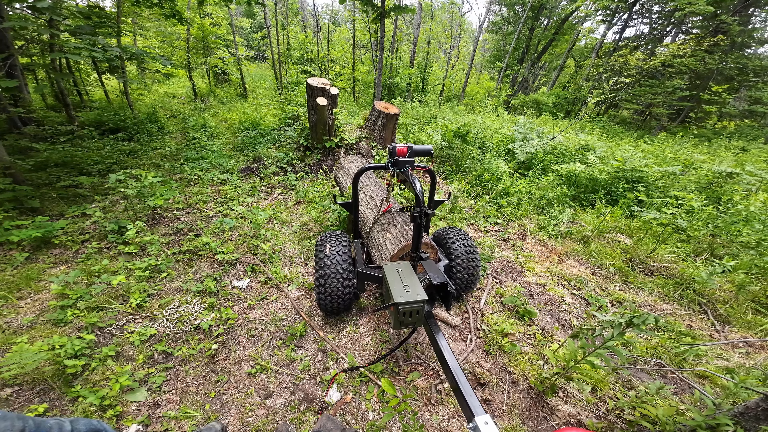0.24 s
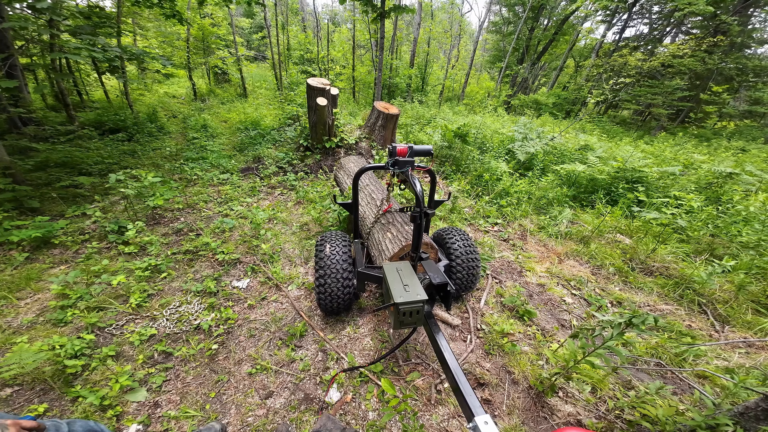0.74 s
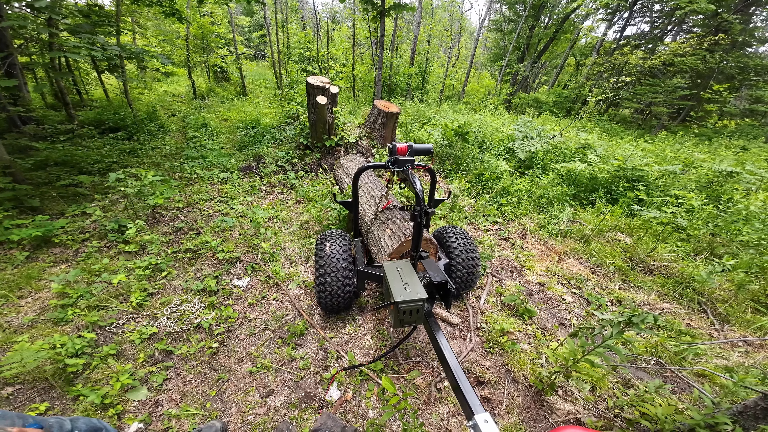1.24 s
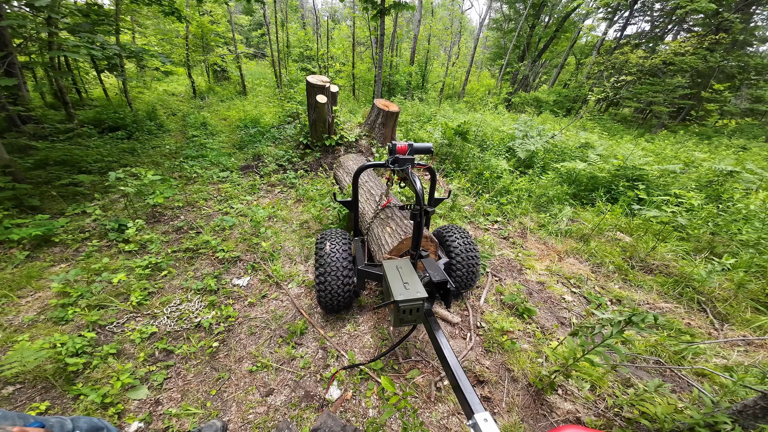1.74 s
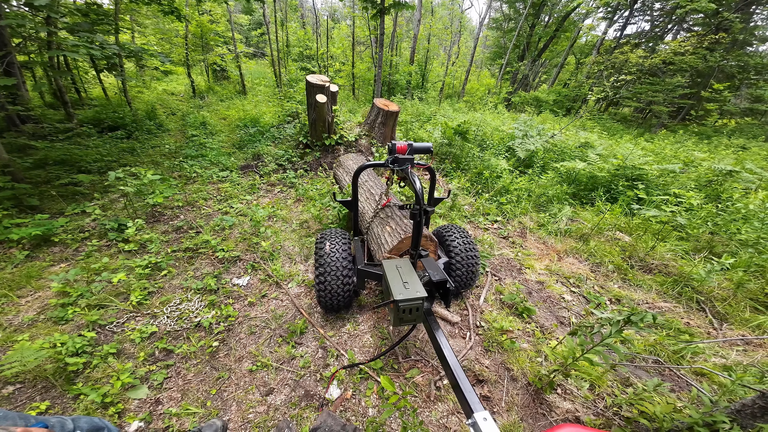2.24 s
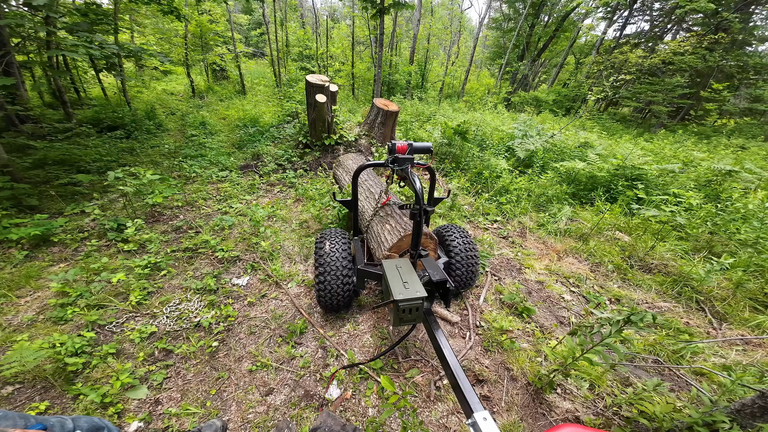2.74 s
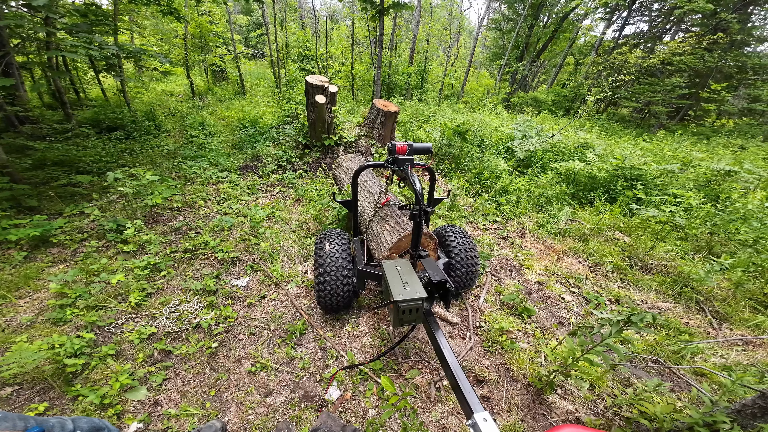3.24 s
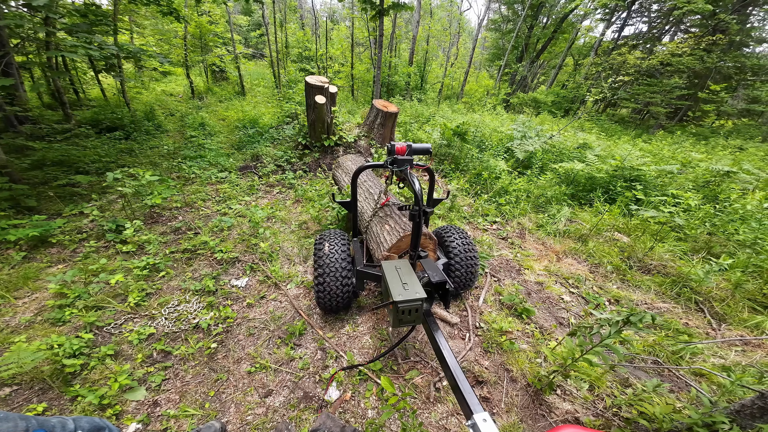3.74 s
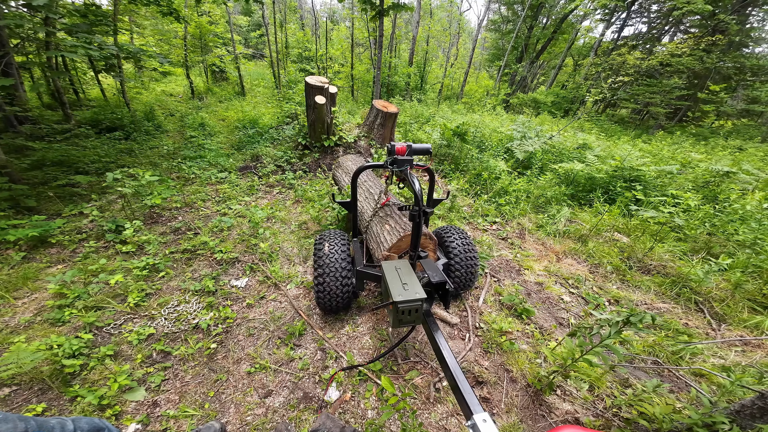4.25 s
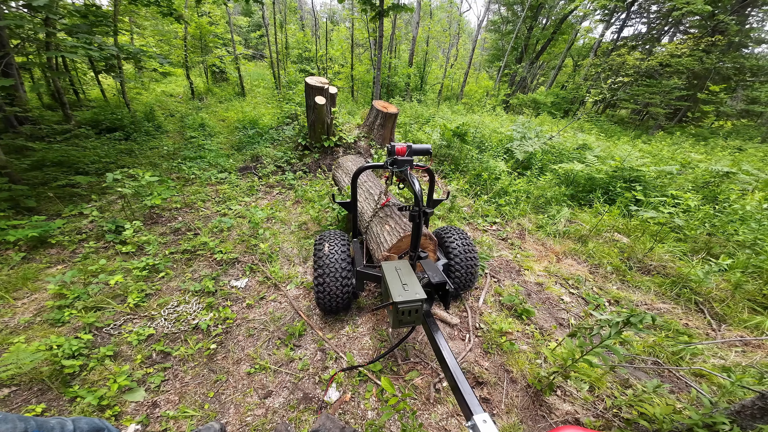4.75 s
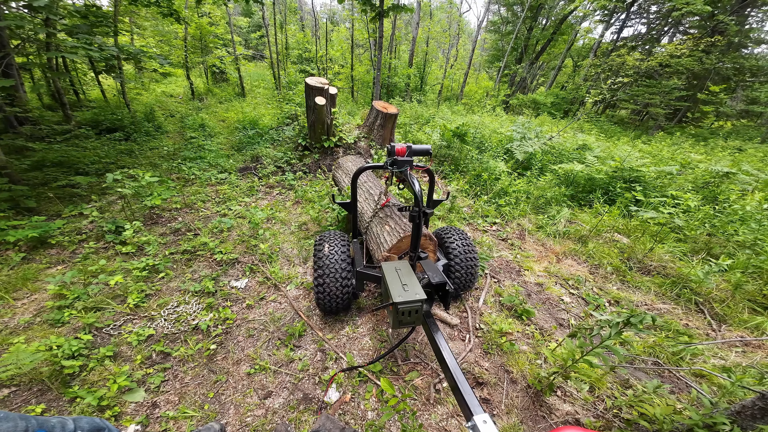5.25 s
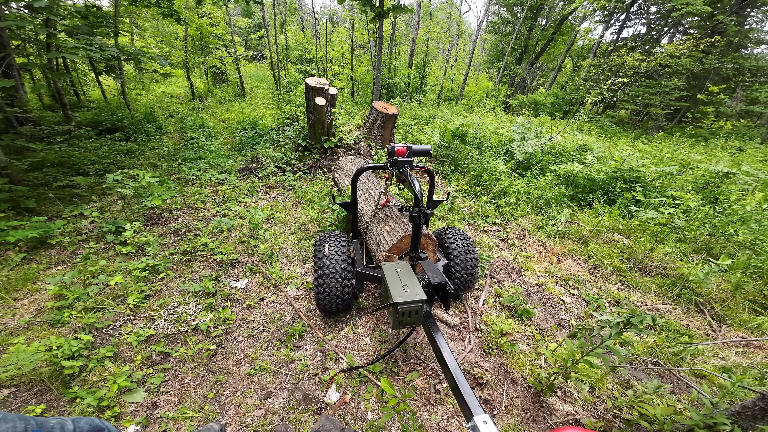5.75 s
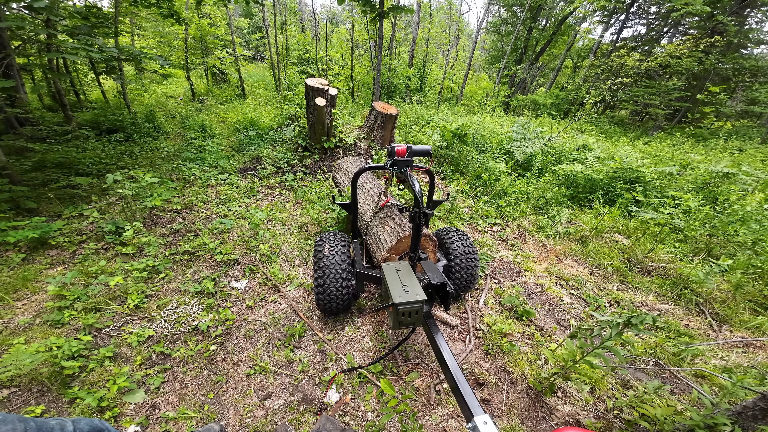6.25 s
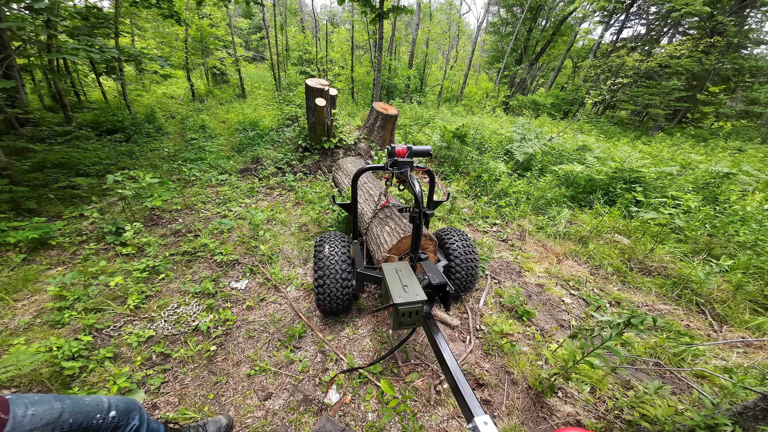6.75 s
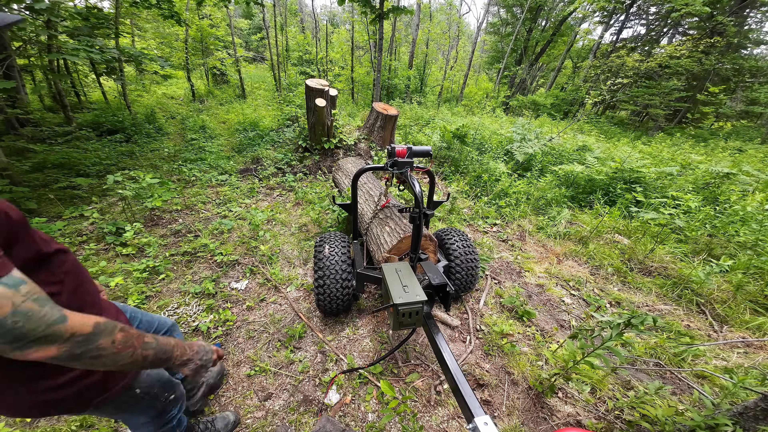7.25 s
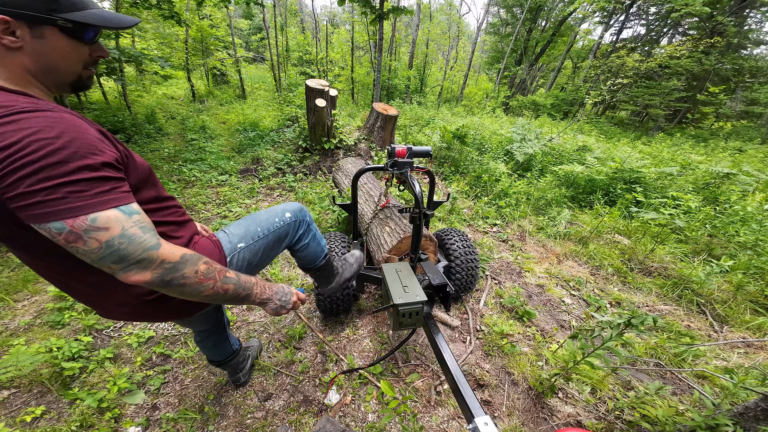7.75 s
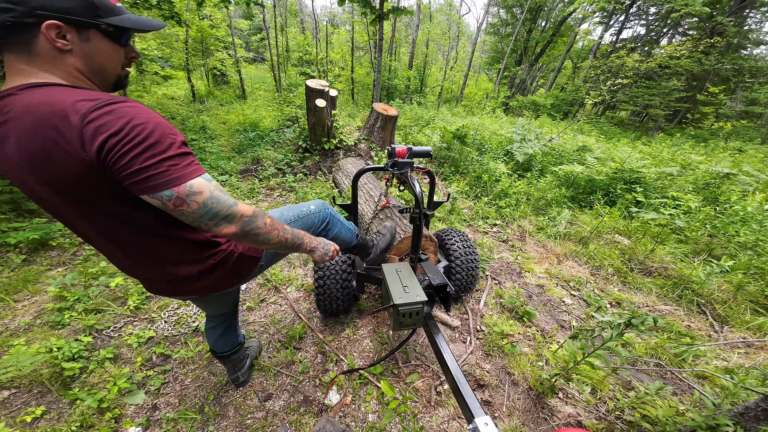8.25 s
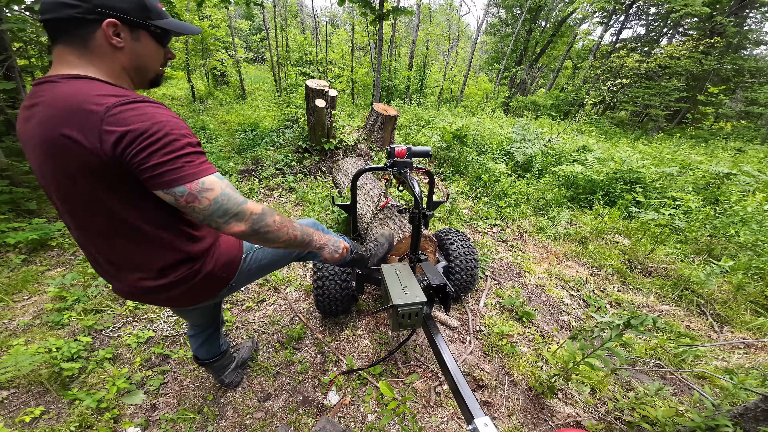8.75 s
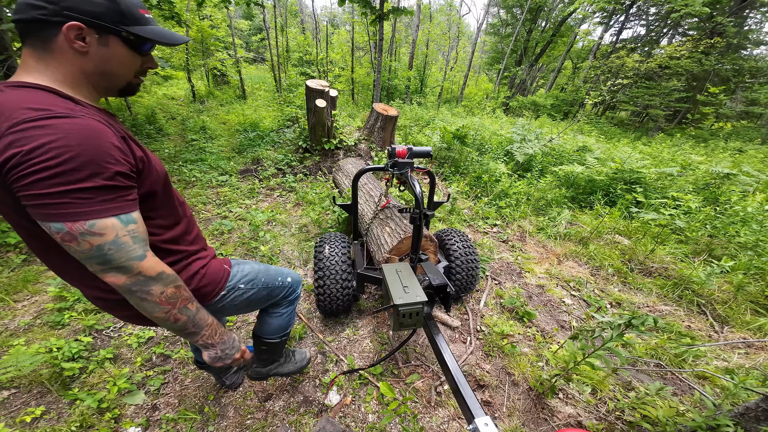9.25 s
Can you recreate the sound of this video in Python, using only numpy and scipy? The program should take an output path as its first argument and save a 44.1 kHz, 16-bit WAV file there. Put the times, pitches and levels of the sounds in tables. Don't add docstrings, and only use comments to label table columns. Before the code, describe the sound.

Five short winch bursts, each starting with a sharp click and a bright, grinding gear whirr over a deep hum, stop quickly and leave thin metallic ringing. Soft leaf hiss and low wind buffeting fill the gaps. Later, footsteps rustle, twigs crack and a log knocks against steel, with bass jolts through the frame-mounted microphone; dry outdoor space with slight tree echo.

```python
import sys
import numpy as np
from scipy import signal
from scipy.fft import rfft, irfft, next_fast_len
from scipy.io import wavfile
from scipy.ndimage import uniform_filter1d

SR = 44100
rng = np.random.default_rng(int(sys.argv[2]) if len(sys.argv) > 2 else 0)


def wav_out(sig):
    wavfile.write(sys.argv[1], SR, np.round(np.clip(np.atleast_2d(sig).T, -1, 1) * 32767).astype(np.int16))


def nominal_scale(level):
    x = np.asarray(level, float) / 20
    return 10 ** x


N = 419214
T = np.arange(N) / SR
SLOW = np.arange(0, N + 32, 32) / SR


def unit(x):
    return x / np.sqrt(np.mean(x ** 2))


def noise():
    return rng.standard_normal(N)


def band(x, lo_hz, hi_hz):
    return signal.sosfilt(signal.butter(2, [lo_hz, hi_hz], "bandpass", fs=SR, output="sos"), x)


def colour(x, points):
    hz, db = np.transpose(points)
    size = next_fast_len(N)
    f = np.log(np.arange(size // 2 + 1) * SR / size + 1)
    return irfft(rfft(x, size) * nominal_scale(np.interp(f, np.log(hz), db)), size)[..., :N]


def ring(x, hz, t60):
    r = np.exp(-np.log(1000) / (t60 * SR))
    turn = 2 * np.pi * hz / SR
    return np.sqrt(4 * (1 - r)) * signal.lfilter([np.sin(turn)], [1, -2 * r * np.cos(turn), r * r], x)


def decaying_modes(modes, t):
    return sum(nominal_scale(db - 60 * t / t60) * np.sin(2 * np.pi * hz * t) for hz, t60, db in modes)


def walk(rate):
    k = int(SR / rate)
    held = np.repeat(rng.standard_normal(N // k + 1), k)[:N]
    return unit(uniform_filter1d(uniform_filter1d(held, k), k))


def curves(tables):
    s, *columns = np.concatenate(tables).T
    return [np.interp(T, s, c) for c in columns]


def swell(s, db, rise_s, fall_s):
    return nominal_scale(db - 30 * np.maximum((s - SLOW) / rise_s, (SLOW - s) / fall_s))


def summed(gains):
    return np.interp(T, SLOW, np.sqrt(sum(g ** 2 for g in gains)))


def strike(events, burst):
    out, t = np.zeros(N + SR), np.arange(SR // 8) / SR
    for row in events:
        i = int(row[0] * SR)
        out[i:i + len(t)] += nominal_scale(row[1]) * burst(row, t)
    return out[:N]


def crack(row, t):
    hz, body_db = row[2:]
    snap = rng.standard_normal(len(t)) * (np.exp(-t / 0.0034) + 0.16 * np.exp(-t / 0.0093))
    bright = band(band(snap, 0.3 * hz, min(1.27 * hz, 16000)), 0.72 * hz, 20000)
    body = band(snap, 230, 3260) + 0.66 * band(snap, 360, 810)
    return 1.15 * bright + nominal_scale(min(body_db, 6) + 0.5) * body


# motor_on_s, motor_off_s, free_whirr_db, coast_s, frame_decay_db_per_s
PULLS = [
    (-.1, 0.403, -30.5, 0.14, 48),
    (0.8571, 1.613, -30, 0.079, 28),
    (2.197, 2.883, -30, 0.15, 12.5),
    (3.538, 4.02, -30.5, 0.44, 22),
    (5.238, 5.723, -33, 0.16, 3.5),
]


def shaft(pulls):
    nexts = [rows[0][0] for rows in pulls[1:]] + [T[-1]]
    parts = []
    for rows, pull, upto in zip(pulls, PULLS, nexts):
        last_s, last_hz, last_db = rows[-1]
        parts += [rows, [(upto - .02, last_hz, last_db - pull[4] * (upto - last_s))]]
    return curves(parts)


def motor(on_s, off_s, db, coast_s):
    engage_db, spin_up_s = -15.5, 0.025
    inrush_db, inrush_s = 3, 0.075
    cut_db, cut_s, coast_db, coast_growl_db = -26.5, 0.029, -37, 12
    times = [on_s - .016, on_s, on_s + spin_up_s, on_s + spin_up_s + inrush_s,
             off_s, off_s + cut_s, off_s + cut_s + coast_s, off_s + 1.7]
    shape_db = np.interp(SLOW, times, [-60, engage_db, inrush_db, 0, 0, cut_db, coast_db, -120])
    extra_db = coast_growl_db * np.interp(SLOW, times[4:6], [0, 1]) * np.array([[0], [1]])
    return (SLOW > times[0]) * nominal_scale(db + shape_db + extra_db)


# loudest_s, level_db, half_length_s, times_shaft_speed
GROANS = [(0.071, -40, .2, 9), (.22, -39.5, 0.28, 7.8), (0.2, -41, 0.13, 5.1), (.13, -39, 0.053, 2),
          (0.36, -38, .11, 9), (.27, -36.5, 0.11, 11), (.03, -38, 0.15, 4.2), (0.938, -38, 0.13, 3.2),
          (1.1, -41.5, 0.31, 4.2), (1.14, -38.5, 0.31, 3), (1.261, -36.5, .2, 10), (0.94, -40, .15, 9),
          (1.533, -38, .15, 9), (1.377, -42, 0.18, 5.4), (1.3, -29, 0.059, 2.04), (1.415, -35, 0.04, 1.92),
          (1.545, -36, 0.078, 1.97), (1.56, -40.5, .3, 4.1), (2.29, -45.5, 0.33, 6.1),
          (2.423, -39, 0.19, 10.9), (2.65, -45, .3, 6.3), (2.67, -44.5, 0.52, 4.24),
          (3.6, -41.5, 0.23, 3.63), (3.7, -39.5, 0.14, 8.6), (3.93, -41, 0.21, 7), (3.94, -40, 0.34, 5.83),
          (3.971, -40.5, 0.25, 5.2), (3.95, -47, .2, 14), (5.29, -36, .12, 3.96), (5.4, -41, 0.21, 5.8),
          (5.67, -36, 0.25, 5.1), (5.64, -37, .25, 6), (6, -43, 0.13, 6.5)]
# loudest_s, level_db, rise_s, fall_s
WHINE = [(.2, -37, .9, 0.83), (1.05, -36.5, 0.63, 1.8), (1.55, -39, 0.52, .25), (2.31, -28, 0.12, 0.34),
         (2.85, -38, 0.49, .15), (3.58, -35, .1, .35), (3.87, -35.5, .25, .3), (3.98, -36.5, 0.19, 0.23),
         (5.3, -39, 0.11, 0.48), (5.5, -42, 0.45, 0.43), (5.67, -42, .3, 0.21)]


def singing(turns):
    out = unit(ring(noise(), 2196, 0.085)) * summed(swell(*row) for row in WHINE)
    for s, db, half_s, times in GROANS:
        near = slice(int(max(s - half_s, 0) * SR), int((s + half_s) * SR))
        gain = nominal_scale(db + 3 - 30 * ((T[near] - s) / half_s) ** 2)
        out[near] += gain * np.sin(2 * np.pi * times * turns[near])
    return out


# time_s, turns_hz, unbalance_db
SHAFT = [
    [(0, 129.8, -33), (.06, 121.8, -29), (.15, 135.1, -34), (.3, 136.7, -35), (.335, 125.9, -29),
     (.4, 127.7, -33), (.52, 112.7, -34.5), (.59, 111.6, -54)],
    [(.86, 110, -48), (.9, 132.7, -35), (.97, 122.1, -30), (1.16, 146.9, -35), (1.31, 121.9, -29),
     (1.39, 135, -25), (1.5, 140, -34), (1.58, 118.8, -29), (1.75, 117.2, -41)],
    [(2.2, 116.6, -58), (2.25, 116.9, -28), (2.35, 123.1, -34), (2.4, 119.7, -28), (2.49, 115.6, -30),
     (2.546, 103.7, -27), (2.7, 104.1, -28), (2.86, 118.2, -23), (3.01, 107.9, -55)],
    [(3.54, 144, -46), (3.63, 125.3, -30), (3.79, 107.3, -29), (3.835, 109.9, -42), (3.916, 107.8, -29),
     (4.04, 108.7, -32), (4.11, 109.1, -36)],
    [(5.232, 151.1, -57), (5.29, 145.9, -31), (5.365, 107.7, -21), (5.41, 104.2, -11), (5.445, 97.25, -13),
     (5.474, 92.4, -11), (5.55, 93.8, -33), (5.63, 107, -41), (5.8, 101.9, -46)],
]
# pitch_hz, level_db_per_hz
GEARS = [(100, -41), (170, -3), (250, 1), (310, -9.5), (450, 6.5), (750, 7), (930, 6), (1300, 11),
         (1700, 5.5), (2200, 7.5), (3200, 1), (4200, -3.5), (8000, -15), (16000, -25.5)]
# pitch_hz, t60_s, level_db
HOUSING = [(555, 0.11, -19), (742, 0.021, -4.5), (1242, 0.12, -17), (1345, 0.18, -12.5), (1800, 0.099, -14),
           (2203, 0.14, -12), (2293, 0.14, -15), (2745, 0.11, -37), (3400, 0.054, -14),
           (3190, 0.076, -15.5), (3890, 0.007, -15), (4960, 0.07, -23), (6300, 0.019, -26),
           (7610, 0.014, -27)]


def winch():
    free_hz, wobble = 130, .014
    whirr_db_per_oct, growl_db, growl_db_per_oct = 15.5, -5, 24.5
    beat_db_per_shake_db = 0.36
    creep = (5.55, 5.835, -46, .04)
    hz, shake_db = shaft(SHAFT)
    octaves = np.log2(hz / free_hz)
    gains = sum(motor(*pull[:4]) for pull in list(PULLS) + [creep])
    whirr, growl = (np.interp(T, SLOW, gain) for gain in gains)
    low_db = growl_db - growl_db_per_oct * octaves + 2.9 * walk(14)
    coast = growl / (whirr + 1e-12)
    hunting = wobble * np.clip(2 + 6 * octaves, 0, 1) * walk(14)
    turns = np.cumsum(hz * (1 + .006 * walk(60) + hunting)) / SR
    beats = unit(np.diff(np.floor(turns), prepend=0.))
    meshes = rng.standard_normal((4, 330)) / np.sqrt(330)
    shares = np.array([walk(18) for _ in meshes])
    shares = shares / np.linalg.norm(shares, axis=0)
    beats = sum(share * signal.fftconvolve(beats, mesh)[:N] for share, mesh in zip(shares, meshes))
    rasp = noise() * (1 + 0.11 * np.cos(2 * np.pi * turns)) * nominal_scale(2.0 * walk(400) + 0.54 * walk(41))
    drive = rasp + 1.35 * nominal_scale(beat_db_per_shake_db * (shake_db + 30)) * band(beats, 300, 1900)
    drive = drive * whirr * nominal_scale(whirr_db_per_oct * octaves)
    gears = colour(drive, GEARS)
    gears = gears * np.std(drive) / np.std(band(gears, 725, 6000))
    body = nominal_scale(-5.5) * sum(nominal_scale(db) * ring(drive, mode_hz, t60) for mode_hz, t60, db in HOUSING)
    growling = coast * nominal_scale(low_db + 2.0) * band(gears, 103, 556)
    return nominal_scale(1.0) * band(gears, 950, 10600) + growling + body + singing(turns) * np.minimum(whirr * nominal_scale(34), 1)


# time_s, pitch_hz, level_db
SHAKE = [
    [(0.0, 131.6, -34), (0.044, 128, -27.5), (0.102, 109, -48), (0.164, 120, -25), (0.212, 135.5, -35),
     (0.32, 134.2, -31.5), (0.386, 117, -36.5), (0.482, 118.6, -33.5), (0.59, 113.7, -51)],
    [(0.86, 88.3, -47), (0.936, 108.5, -30), (1.15, 147.2, -35), (1.248, 141.2, -32), (1.392, 118.6, -28.5),
     (1.44, 136, -29.5), (1.52, 134.9, -39), (1.586, 114.6, -26), (1.75, 118.2, -43.5)],
    [(2.2, 116.7, -52), (2.248, 114.5, -31), (2.356, 117.5, -23.5), (2.38, 117, -47), (2.49, 117.3, -30.5),
     (2.556, 103.7, -20.5), (2.7, 104, -29.5), (2.846, 116.1, -27), (3.01, 110, -48.5)],
    [(3.54, 107, -56), (3.574, 105.9, -36), (3.648, 124, -36.5), (3.69, 114.2, -33), (3.794, 111.4, -21),
     (3.836, 110.9, -36.5), (3.922, 112, -18), (4.05, 109.5, -28), (4.13, 109.1, -44.5)],
    [(5.235, 105.5, -74), (5.259, 105.9, -34), (5.331, 107.3, -39), (5.391, 105.9, -17.5),
     (5.493, 93.4, -20.5), (5.517, 89.4, -34), (5.673, 104.4, -35.5), (5.815, 87.16, -39),
     (5.93, 87.5, -46.5)],
]
# lull_s, level_db, half_width_s
LULLS = [(.27, -6, 0.028), (.375, -5, .02), (1.0, -7, 0.026), (1.11, -5, .02), (1.345, -12, 0.024),
         (1.5, -5, 0.043), (2.575, -10, .015), (5.444, -12, .015)]
# time_s, level_db
SHOVES = [
    [(8.04, -82), (8.084, -37), (8.18, -37), (8.202, -25), (8.302, -25), (8.32, -32), (8.456, -45),
     (8.58, -47.5)],
    [(8.6, -51), (8.732, -18.5), (8.794, -30), (8.882, -36.5), (8.916, -27), (9.0, -36), (9.028, -45),
     (9.1, -43)],
    [(9.12, -48), (9.136, -51), (9.24, -44.5), (9.268, -56), (9.284, -52), (9.426, -51), (9.466, -32.5),
     (9.505, -40)],
]


def frame():
    shove_from_s, shove_hz = 8.04, 84
    flutter_db, steady_hz, overtone_db = 2, 110, -24.5
    hz, db = shaft(SHAKE)
    shoved = T > shove_from_s
    hz = np.where(shoved, shove_hz * (1 + 0.0547 * walk(8)), hz)
    lull_db = sum(dip_db * np.exp(-((T - s) / half_s) ** 2) for s, dip_db, half_s in LULLS)
    level_db = np.where(shoved, curves(SHOVES)[0] - 0.1, db + lull_db)
    depth_db = 2.5 + flutter_db * np.clip((hz - steady_hz) / 30, 0, 1)
    gain = nominal_scale(level_db + depth_db * np.minimum(walk(30), .2))
    turn = 2 * np.pi * np.cumsum(hz * (1 + 0.04636 * walk(40))) / SR
    overtone = nominal_scale(overtone_db + 4 * walk(15)) * np.sin(2 * turn)
    left = nominal_scale(4.0 + .8 * walk(20)) * (np.sin(turn) + overtone)
    right = nominal_scale(-3.0 + 2.4 * walk(6)) * np.sin(turn - 1.9 + 1.13 * walk(7))
    left_jolt = unit(band(band(noise(), 54, 123), 54, 123))
    right_jolt = 0.39 * unit(band(noise(), 65, 126))
    jolt = shoved * nominal_scale(-2.0) * np.array([left_jolt, right_jolt])
    return gain * nominal_scale(6.5) * (np.array([left, right]) + jolt)


# pitch_hz, level_db_per_hz
WOOD = [(35, -29), (60, 9), (130, -4.5), (165, -7), (600, -16.5), (1400, -21.5), (3300, -26.5),
        (8000, -33.5), (16000, -46.5)]
# pitch_hz, side_minus_mid_db
WOOD_SIDE = [(60, 3), (110, 2), (200, -2), (380, -6), (1290, -7), (2380, -6), (4400, -4), (8120, -2),
             (15000, 0)]
# strongest_s, level_db
GUSTS = [(0, -34), (0.501, -37), (1.15, -31.5), (1.67, -33.5), (2.3, -32), (2.91, -34), (3.6, -41),
         (4.1, -38.5), (5.8, -36), (8.31, -34), (8.9, -31.5), (9.5, -45)]


def background():
    wood_db, calm_db, gust_rise_s, gust_fall_s = -63, -56, 0.48, 0.99
    mid = colour(noise(), WOOD)
    side = colour(np.roll(mid, N // 2), WOOD_SIDE)
    hiss = nominal_scale(wood_db + walk(1)) / np.std(band(mid, 200, 16000)) * np.array([mid + side, mid - side])
    gain = summed([nominal_scale(calm_db)] + [swell(*row, gust_rise_s, gust_fall_s) for row in GUSTS])
    own, opposite = (unit(band(noise(), 29, 62)) * gain * nominal_scale(2.0 * walk(6)) for _ in range(2))
    return hiss + nominal_scale(-9.0) * own + nominal_scale(8.0) * opposite * np.array([[1.22], [-.78]])


# pitch_hz, t60_s, level_db
CABLE = [(420, 2.43, 1), (432, 1.2, -7), (850, 3.6, -12.5)]
# pitch_hz, t60_s
ARCH = [(1330, 0.62), (2205, .5)]
# cable_db, lower_arch_db, upper_arch_db
STOPS = [
    (-58, -70, -68),
    (-53.5, -62, -52),
    (-59, -52, -60),
    (-59.5, -68, -53.5),
    (-62.5, -52, -55),
]


def cable():
    out = 0
    for pull, (db, *arch_db) in zip(PULLS, STOPS):
        t = np.maximum(T - pull[1], 0)
        modes = [(hz, t60, db + mode_db) for hz, t60, mode_db in CABLE]
        modes += [(*mode, hit_db) for mode, hit_db in zip(ARCH, arch_db)]
        out = out + decaying_modes(modes, t)
    return out * nominal_scale(2 * walk(20))


# start_s, level_db
SWITCH = [
    (0.7059, -40.5),
    (2.0459, -40.5),
    (3.4004, -40.5),
    (4.2925, -54.5),
    (4.371, -53.5),
    (4.645, -61),
    (5.1042, -42),
    (6.4721, -43.5),
]
# pitch_hz, t60_s, level_db
SWITCH_MODES = [(1780, .025, -13), (2990, 0.031, -8.5), (7210, .015, -12)]


def relay():
    contactor = (-31.5, 6420, -1)
    rows = [(pull[0], *contactor) for pull in PULLS[1:]]
    rows += [(*row, 7340, 4) for row in SWITCH]  # Hz, body dB
    return strike(rows, crack) + strike(SWITCH, lambda row, t: decaying_modes(SWITCH_MODES, t))


# start_s, level_db, pitch_hz
STRANDS = [(.8464, -46, 6564), (.854, -46, 5224), (.918, -24.5, 9430), (1.231, -39, 10000),
           (1.341, -34.5, 9000), (1.762, -54, 7963), (1.832, -60, 5240), (2.192, -36, 4090),
           (2.8082, -27, 6180), (3.44, -51, 6385), (3.4692, -51, 8174), (3.5065, -49, 7000),
           (3.527, -44, 5200), (3.477, -51, 6200), (3.54, -33, 5000), (5.735, -48, 6975), (4.22, -46, 2497),
           (4.578, -43.5, 5980), (5.8573, -41.5, 6050), (6.257, -40.5, 6226)]
# start_s, level_db, clicks, spacing_s
TRILLS = [
    (1.849, -54.5, 5, 0.0087),
    (3.051, -45.5, 2, 0.013),
    (3.209, -46, 3, 0.014),
    (4.21, -49.5, 4, .0085),
    (9.178, -42, 5, .012),
    (9.377, -42.5, 5, 0.012),
]


def strands():
    rows = [(s + k * gap, db, 7000., -25.) for s, db, count, gap in TRILLS for k in range(round(count))]
    return strike(rows + [(*row, -7) for row in STRANDS], crack)


# start_s, level_db, pitch_hz, crunch_db
KNOCKS = [(1.825, -44.5, 256.4, -9), (3.059, -43.5, 277, -6), (7.103, -45.5, 208, -4),
          (8.09, -26, 208.9, -17), (8.189, -22.5, 426.4, -11), (8.409, -44, 560, -18),
          (8.626, -30.5, 307, -12), (8.699, -16.5, 377.6, -14), (8.712, -23.5, 255, -20),
          (8.805, -32, 256, -7), (8.885, -34, 279, -9), (8.916, -31, 206, -19), (8.215, -29.5, 475, -18),
          (8.745, -30, 248, -25), (9.04, -35, 520, -21), (9.28, -50, 420, -10), (9.03, -28.5, 491, -20),
          (9.08, -30, 203, -8), (9.169, -42.5, 233, -20), (9.417, -36.5, 570, -15),
          (9.446, -26.5, 237, -23)]


def knocks():
    def burst(row, t):
        hz, crunch_db = row[2:]
        fade = np.exp(-t / 0.0094) * (1 - np.exp(-t / 0.0031))
        modes = np.sin(2 * np.pi * hz * t) + 0.47 * np.sin(2 * np.pi * 1.4 * hz * t)
        chance = rng.standard_normal(len(t))
        thud = modes + 2.2 * band(chance, 120, 800)
        return fade * (nominal_scale(2.5) * thud + nominal_scale(min(crunch_db, -6) + 3.0) * band(chance, 880, 3200))
    return strike(KNOCKS, burst)


def creak():
    loudest_s, level_db, rise_s, fall_s = 6.63, -62, .5, .12
    hz = np.interp(T, [loudest_s - rise_s / 2, loudest_s], (188, 181))
    slip = 2 * np.pi * np.cumsum(hz * (1 + .012 * walk(60))) / SR
    stack = [(1, 7.5), (2, 2.5), (3, -12), (4, -4), (5, -4), (6, -7)]  # multiple, dB
    tone = sum(nominal_scale(db) * np.sin(k * slip) for k, db in stack)
    return summed([swell(loudest_s, level_db, rise_s, fall_s)]) * tone


# loudest_s, level_db, rise_s, fall_s, scrape_below_1500_hz_db
RUSTLE = [(7.02, -59, 0.32, 0.61, -6.5), (7.008, -46.5, .05, 0.041, -4), (7.1, -50.5, 0.073, 0.14, -10),
          (7.187, -49, 0.067, 0.14, -11), (7.472, -43.5, 0.13, 0.19, -4.5),
          (8.094, -42.5, 0.018, 0.28, 3.5), (8.181, -48, 0.0091, 0.1, 12), (8.2, -63, 0.03, 0.13, 6),
          (8.386, -52, 0.012, 0.14, 3), (8.64, -48.5, 0.063, 0.46, 2.5), (8.79, -48.5, 0.23, 0.16, -1),
          (8.885, -49.5, 0.011, 0.12, 11), (8.985, -42, 0.045, 0.062, 5), (9.084, -54.5, 0.013, 0.1, 7.5),
          (9.216, -48.5, 0.077, 0.06, -5), (9.45, -41, 0.016, 0.11, -1.5), (9.506, -49, .25, 0.11, 4)]
# pitch_hz, level_db_per_hz
LEAVES = [(600, -40), (1500, -2), (3400, 2.5), (8000, -1.5), (16000, -13.5)]


def rustle():
    gain = summed(swell(*row[:4]) for row in RUSTLE)
    scrape = summed(swell(*row[:4]) * nominal_scale(row[4]) for row in RUSTLE)
    sizes = np.minimum(rng.exponential(size=N // 60 + 1), 3.5).repeat(60)[:N]
    grains = noise() * nominal_scale(2.6 * sizes + 1.5 * walk(70))
    return nominal_scale(-5.5) * (gain * unit(colour(grains, LEAVES)) + scrape * unit(band(grains, 120, 1760)))


# start_s, level_db, pitch_hz, body_db
TWIGS = [(7.009, -45, 5655, 1), (7.1846, -46, 9700, -5), (7.4614, -37.5, 10000, 2),
         (7.5435, -44, 11370, -22), (8.0865, -51, 4970, 0), (8.151, -39, 4020, 7),
         (8.2721, -37.5, 6300, -4), (8.3889, -38, 5270, -16), (8.5754, -50, 5500, -21),
         (8.671, -40, 4960, -17), (8.705, -38, 4870, 8), (8.7425, -35, 5626, -15), (8.7999, -40, 9810, -7),
         (8.961, -44, 5510, -14), (8.9835, -27, 5350, -14), (9.04, -51, 3800, -20), (8.889, -49, 3200, -2),
         (9.1476, -47.5, 10650, -11), (9.2748, -41.5, 6780, -7), (9.3018, -53, 9800, 0),
         (9.4823, -37, 9320, -15)]


def twigs():
    return strike(TWIGS, crack)


# pitch_hz, side_minus_mid_db
PORTS = [(60, 0), (200, -1), (330, -8), (500, -21), (1290, -24), (2380, -21), (4400, -13), (8120, -5),
         (15000, -6)]


def ports(mid):
    t = np.arange(400) / SR
    smear = rng.standard_normal(400) * np.exp(-t / 0.006)
    side = colour(signal.fftconvolve(mid, smear / np.linalg.norm(smear))[:N], PORTS)
    side = side + colour(mid, [(250, -6), (350, -9), (500, -30)])
    return np.array([mid + side, mid - side])


def scene():
    trees_t60_s, trees_db = 0.33, -21.5
    air = winch() + cable() + relay() + strands() + knocks() + creak() + rustle() + twigs()
    t = np.arange(SR) / SR
    tail = band(rng.standard_normal(SR), 140, 7500) * np.exp(-np.log(1000) * t / trees_t60_s) * (t > .015)
    echo = nominal_scale(trees_db) * signal.fftconvolve(air, tail / np.linalg.norm(tail))[:N]
    return ports(air + echo) + frame() + background()


def top_cut(x):
    return signal.sosfilt(signal.butter(12, 16470, fs=SR, output="sos"), x)


# pitch_hz, level_db
MIC = [(3500, 0.5), (4400, -3), (4960, 0), (5400, 1), (6050, 2.5), (6700, -2.5), (7250, 1), (8600, -4.5),
       (9800, 4), (11300, 1), (12400, -8.5), (14000, -8), (15600, -1), (16400, -45)]


def record(dry):
    dropout_s, dropout_db = (.3045, .3055, .3145, .323), -30
    gap = np.interp(T, dropout_s, [1, nominal_scale(dropout_db), nominal_scale(dropout_db), 1])
    return top_cut(colour(dry, MIC) * gap)


dry = scene()
out = record(dry)
wav_out(out)
```